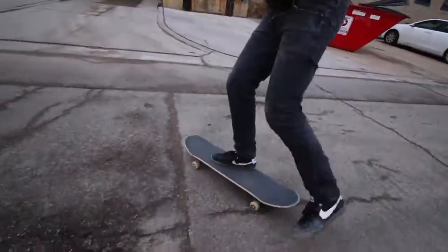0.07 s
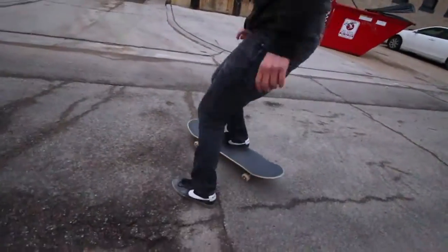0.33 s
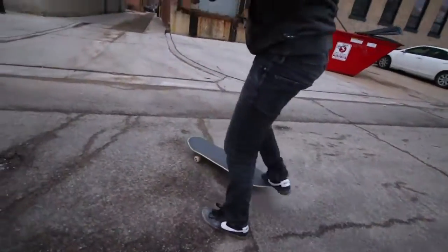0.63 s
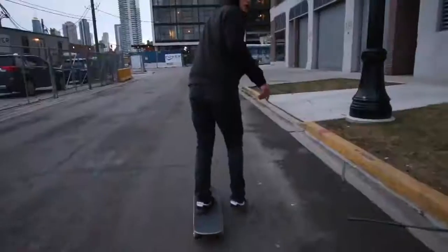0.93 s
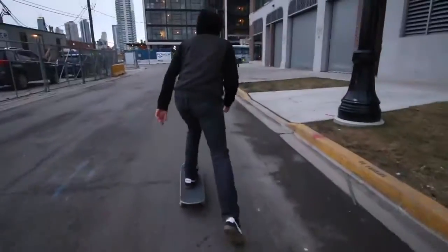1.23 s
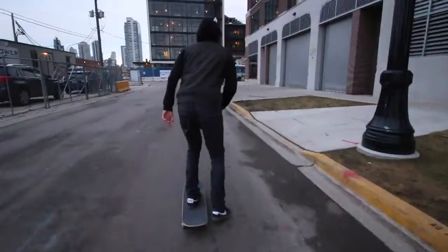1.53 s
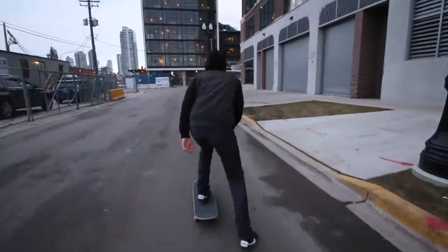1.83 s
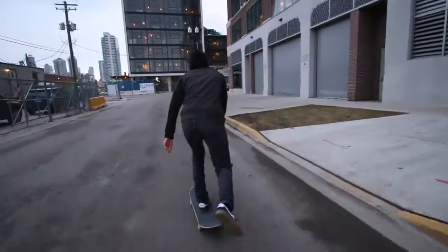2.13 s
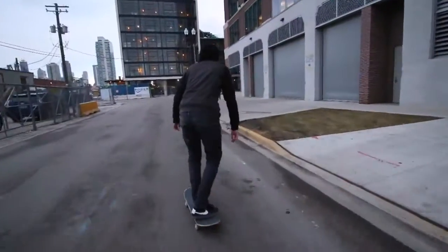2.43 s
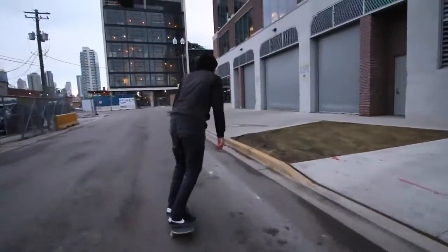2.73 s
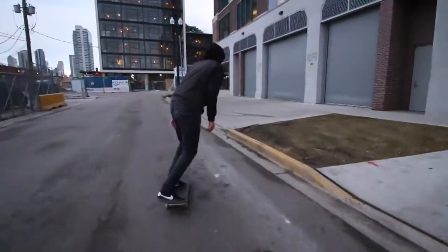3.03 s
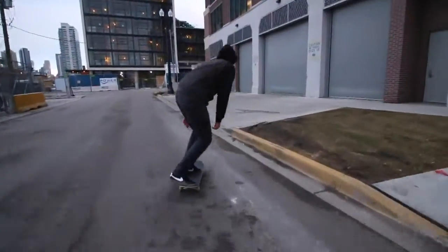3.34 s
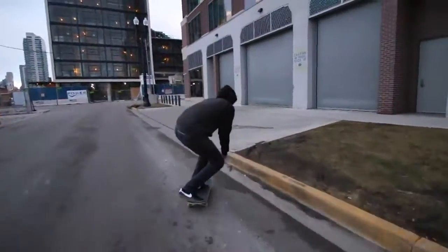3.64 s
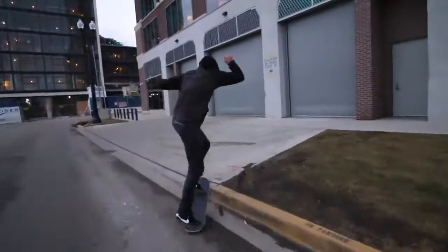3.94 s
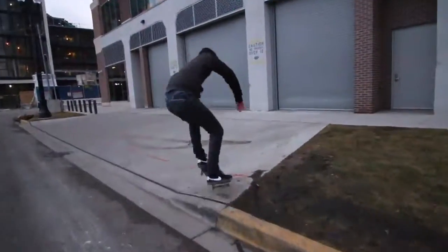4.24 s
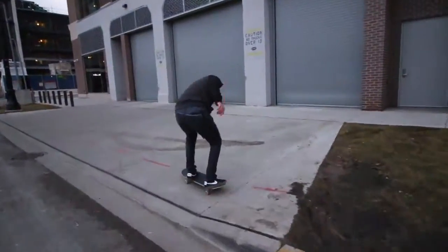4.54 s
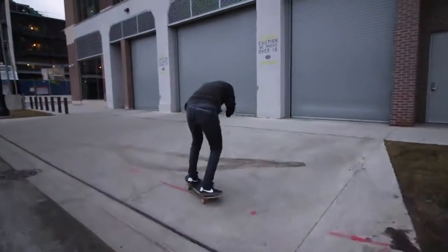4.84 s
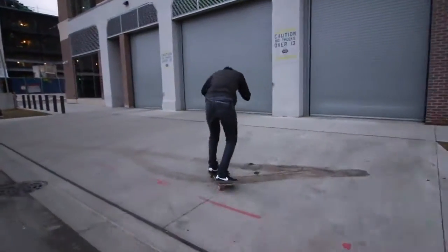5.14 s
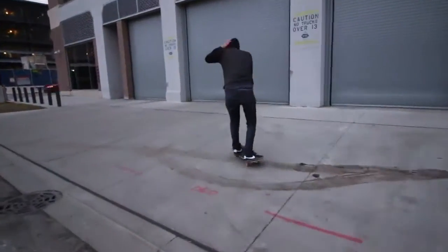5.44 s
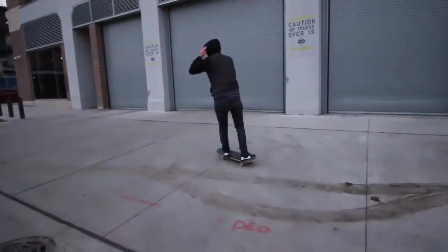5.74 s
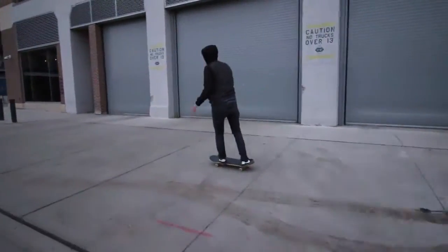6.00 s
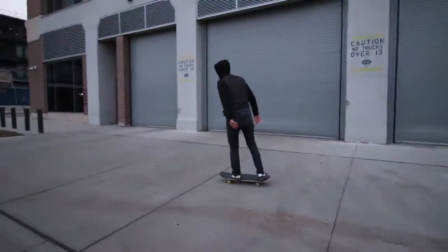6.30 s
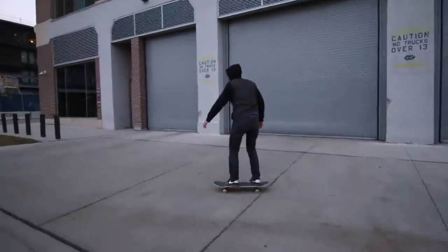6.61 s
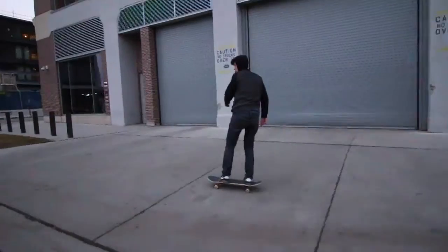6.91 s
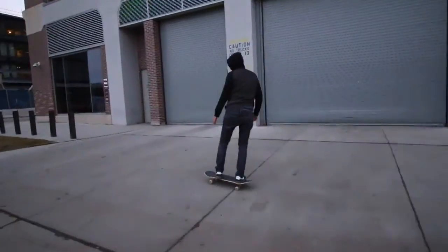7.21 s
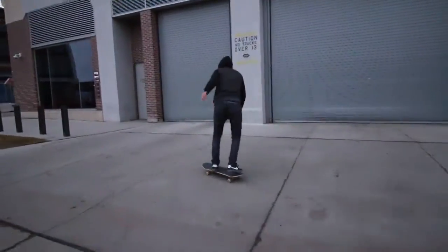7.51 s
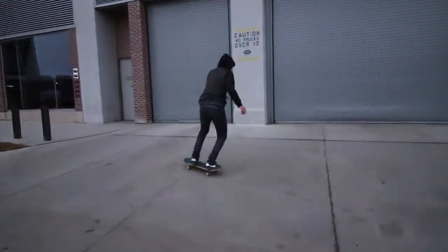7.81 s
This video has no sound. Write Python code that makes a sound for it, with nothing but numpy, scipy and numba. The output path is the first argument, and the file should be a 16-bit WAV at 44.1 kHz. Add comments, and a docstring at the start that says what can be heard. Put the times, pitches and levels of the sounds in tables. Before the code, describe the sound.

On a city street, a skateboard rattles, scrapes and slaps down before rolling off with a close, steady rumble and crackling sand. Soles scuff the road as another skater ahead carves, jumps a kerb and lands with a sharp clack. Both boards roll on with small metal clinks and thuds over slab joints. Wind buffets the low, moving microphone in gusts.

```python
"""A skateboard rolling down a city street, microphone low over its wheels, a second skater just ahead.
The follower scrapes his board along the ground, drops it and rides: asphalt grains drum on the deck and
ring the wheels, sand crackles, slab joints thump. Soles scuff; the skater ahead carves, pops up a kerb
and lands with a clack. House fronts return a short echo, and wind buffets the microphone ports."""
import sys
import numpy as np
from scipy import signal
from scipy.fft import rfft, irfft
from scipy.io import wavfile
from scipy.ndimage import uniform_filter1d
from numba import njit

SR = 44100
rng = np.random.default_rng(int(sys.argv[2]) if len(sys.argv) > 2 else 0)


def wav_out(sig):
    """Save sig, one row per channel (or a flat mono array), as 16-bit PCM at SR to the path in sys.argv[1]."""
    wavfile.write(sys.argv[1], SR, np.round(np.clip(np.atleast_2d(sig).T, -1, 1) * 32767).astype(np.int16))


N = 351036
TIME = np.arange(N) / SR
RIDE_START_S = 0.921

# The near deck's rumble, louder on coarse road. Each row: time in seconds, level in dB.
ROLL_LEVELS = [(0.93, -17.5), (1.15, -19.5), (1.55, -18.5), (2.1, -19), (2.55, -15.5), (2.7, -25.5),
               (3.0, -21.5), (3.3, -17.5), (3.55, -22.5), (3.8, -16.5), (4.1, -20), (5.0, -18), (5.55, -17),
               (6.0, -17.5), (6.4, -19.5), (7.1, -18), (7.96, -19)]
# Its boom, shifting as the rider's weight moves.
# Each row: time in seconds, pitch in Hz, level against the rumble in dB.
DECK_BOOM = [(0.95, 575, -17), (1.35, 480, -6), (1.6, 485, -5), (1.95, 425, -8), (2.25, 470, -12),
             (2.52, 610, -13), (2.75, 475, -10), (3.08, 450, -14), (3.25, 590, -19), (3.6, 472, -16),
             (4.5, 495, -9.5), (5.5, 446, -22), (5.85, 458, -4), (6.05, 525, -4.5), (6.4, 508, -25.5),
             (7.96, 544, -9.5)]
# Stones and slab joints under the microphone. Each row: start in seconds, attack level in dB.
JOLTS = [(1.354, -18), (1.685, -20), (3.166, -15), (3.257, -16), (6.018, -17), (6.043, -12), (6.136, -22),
         (6.195, -15.5), (6.289, -12), (7.612, -14)]
# The loose board striking the ground before the ride. Each row: start in seconds, attack level in dB,
# brightness in dB per octave, ring against blow in dB, pitch ratio of the ring.
LOOSE_CLACKS = [(0.11, -23, -8, -2, 1.1), (0.139, -28, -3.5, -6, 1), (0.159, -21, -9.5, 7, 0.9),
                (0.297, -23, -3, -24, 1.2), (0.346, -19, -4, 17, 0.87), (0.374, -23.5, -4, -4, 1.1),
                (0.548, -25, -1, -10, 1.9), (0.8334, -7, 2.5, -5, 1.01), (0.872, -18, 0.5, -1, 1.1),
                (0.887, -22.5, 1.5, -6, 1.8)]
# The deck ahead knocking underfoot: bumps, pop, double slap of the landing, rebounds. Rows as above.
RIDDEN_CLACKS = [(2.766, -18, -14.5, -8, 1.13), (3.361, -20, -10, -8, 1.1), (3.915, -19, -11, 9, 0.84),
                 (4.0499, -17.5, -1, 1, 1.13), (4.059, -21.5, -3.5, -1, 1.18), (4.3755, -16.5, -0.5, 3, 1),
                 (4.378, -15.5, -1, 3, 1.01), (4.391, -25, 1.5, -2, 1.08), (4.419, -28, -7, 3, 1.4),
                 (7.762, -20.5, -13.5, -1, 1.1)]
# The loose maple deck's ring. Each row: frequency in Hz, level in dB, 60 dB decay time in seconds,
# all before a clack's own pitch ratio and brightness.
LOOSE_MODES = [(664, 0, 0.04), (1350, -5, 0.04), (1630, -11, 0.03), (2230, -10, 0.022), (2900, -22, 0.03)]
# The deck ahead, clamped underfoot, rings higher. Rows as above.
RIDDEN_MODES = [(980, 0, 0.034), (1240, -1, 0.036), (1450, 1, 0.022), (1770, -12, 0.045), (2180, -7, 0.03),
                (2550, -5, 0.03), (3600, -12, 0.018)]
# The metal trucks' ring. Each row: frequency in Hz, relative level in dB.
TRUCK_MODES = [(1750, 2), (2270, 10.5), (3250, -3.5), (4800, -5)]
# Swells of wheel chatter and sand from either board: scraping, rolling off, swerving, landing.
# Each row: middle in seconds, length in seconds, chatter level in dB, sand level in dB.
WHEEL_SWELLS = [(0.106, 0.094, -39, -49), (0.507, 0.21, -28.5, -37), (0.8, 0.15, -34.5, -44),
                (0.992, 0.19, -29.5, -64), (2.348, 0.83, -44, -48), (2.593, 0.72, -28, -62),
                (3.287, 0.18, -27, -48), (3.865, 0.34, -28.5, -42.5), (4.483, 0.12, -33, -45),
                (5.494, 1, -37, -50), (7.16, 0.82, -35.5, -42.5), (7.887, 0.06, -36, -41)]
# Soles, board edge and sideways-sliding wheels scraping on the road. Each row: start and end in seconds,
# level in dB, brightness in dB per octave, sand level in dB.
SCUFFS = [(0.32, 0.417, -38, 5, -55), (0.412, 0.567, -29.5, 1.5, -47), (0.565, 0.652, -41, 5, -59),
          (0.647, 0.726, -34, 8.5, -47), (1.048, 1.253, -26, -4.5, -52), (1.68, 1.933, -26, -6, -52.5),
          (2.639, 2.7, -25.5, -8.5, -63), (3.155, 3.62, -27, -14.5, -59), (3.7, 3.993, -27, -13.5, -59)]
# The trucks ahead twisting or crossing a joint.
# Each row: start in seconds, attack level in dB, pitch ratio of the ring.
CLINKS = [(2.731, -35, 1.46), (3.3065, -36, 1.5), (3.5405, -39, 1.25), (4.807, -32, 1.17),
          (4.938, -35, 1.28), (5.284, -38, 1.55), (7.446, -28.5, 1.43), (7.522, -31, 1.3),
          (7.873, -29.5, 1.27)]
# Pebbles cracking and hardware clicking. Each row: start in seconds, peak level in dB.
TICKS = [(0.331, -29.5), (2.731, -37), (3.806, -21), (3.88, -21), (4.376, -20), (4.433, -26), (4.526, -23),
         (4.573, -29), (7.439, -25), (7.7535, -31.5)]
# Coarse grit bursting under the wheels. Each row: middle in seconds, length in seconds, level in dB.
CRUNCHES = [(3.85, 0.16, -48), (4.416, 0.054, -44), (4.52, 0.13, -53)]
# A free wheel singing in its bearing. Each row: frequency in Hz, level in dB.
BEARING_TONES = [(2650, -44.5), (2750, -49)]
# Wind at the microphone. Each row: middle in seconds, length in seconds, rise in dB (negative: a lull).
GUSTS = [(1.2, 0.35, 1), (1.85, 0.39, -5), (2.397, 0.2, 4.5), (2.965, 0.51, 13), (3.636, 0.23, 5.5),
         (4.24, 0.43, 8.5), (6.38, 0.56, -10.5), (7.718, 0.61, 7)]

# Each source's spectrum at the microphone. Each row: frequency in Hz, relative level in dB.
DECK_COLOUR = [(40, -30), (80, -20.5), (160, -4.5), (260, 0), (400, 0.5), (490, 0), (640, 0.5), (740, -8),
               (860, -21), (1300, -34)]
WHEEL_COLOUR = [(500, -11.5), (860, -4), (950, 2.5), (1005, 9.5), (1080, 4), (1250, -4), (1500, -12.5),
                (2000, -33.5), (3000, -25), (4800, -49.5), (7000, -45.5), (12000, -59)]
CLACK_COLOUR = [(120, -35), (300, 11.5), (500, 5), (700, 8.5), (880, 3), (1150, 7.5), (1600, 4), (2800, -4),
                (4200, -10), (6000, -18), (9500, -28), (15000, -47)]
CHATTER_COLOUR = [(200, -10.5), (430, -4.5), (620, 12), (850, 4.5), (1050, 8.5), (1500, 0), (1900, -3.5),
                  (2300, -12), (3200, -32), (5000, -33.5), (9000, -47)]
WHEEL_SAND_COLOUR = [(1000, 8.5), (2500, 14.5), (4800, 5.5), (6500, -1), (7600, -3.5), (9800, -2),
                     (12500, -12.5), (15500, -58)]
SCUFF_COLOUR = [(400, -8.5), (900, -11.5), (1200, -3), (1480, 4), (1850, -4), (2450, -5), (2800, -14),
                (4000, -21), (7000, -35), (14000, -51)]
SCUFF_SAND_COLOUR = [(2500, -8), (4500, -5.5), (6400, 1), (8000, -4), (9500, -3.5), (12500, -13),
                     (15500, -31)]
TICK_COLOUR = [(1000, -28), (3000, 5), (5000, 8), (9000, 8.5), (12500, 3), (15500, -4)]
WIND_COLOUR = [(25, -22), (45, -7.5), (90, -0.5), (160, 3.5), (250, -1.5), (400, -8), (650, -14.5),
               (1000, -26)]
RUMBLE_COLOUR = [(45, -10.5), (85, 0.5), (130, -3), (230, 0.5), (320, -4.5), (430, -15.5)]
# Stereo width of sounds off the road. Each row: frequency in Hz, side against mid in dB.
SIDE_COLOUR = [(100, -22), (500, -37.5), (1000, -22.5), (2000, -6.5), (4000, -2), (12000, -1.5)]


def near_board(turns, wheels_db=-11, trucks_db=-18.5):
    """Just under the microphone, road stones drum the deck and ring the wheels; chips shake the trucks."""
    road = grains(per_s=4800, scatter_db=1)
    chips = grains(per_s=540, scatter_db=3)
    deck = unit(colour(road, DECK_COLOUR))
    wheels = unit(colour(road * turns, WHEEL_COLOUR))
    wheels += unit(truck_ring(chips * turns)) * undb(trucks_db)
    board = deck + deck_boom(deck) + wheels * undb(wheels_db)
    standing_on = np.clip((TIME - RIDE_START_S) / 0.011, 0, 1)
    return board * undb(curve(ROLL_LEVELS)) * standing_on


def deck_boom(deck):
    """The deck's main bending resonance glides under the rider's weight."""
    boom = resonate(deck, curve(DECK_BOOM), q=7.5)
    return unit(boom) * undb(curve(DECK_BOOM, column=2))


def truck_ring(chips, t60=0.009):
    """Metal hangers and axles, damped by their bushings, ring for a few milliseconds."""
    t = np.arange(SR // 20) / SR
    ring = sum(decaying_tone(t, hz, db, t60) for hz, db in TRUCK_MODES)
    return signal.oaconvolve(chips, ring[None], axes=-1)[:, :N]


def wheel_turns(turn_hz, depth_db):
    """A worn wheel presses harder once in each turn."""
    revolutions = np.cumsum(turn_hz * (1 + 0.0694 * walk(2))) / SR
    return undb(depth_db * np.sin(2 * np.pi * revolutions))


def jolts(wheel_db=-8):
    """A near wheel meets a joint or a stone: one close thump rings the deck's boom and the wheel."""
    out, boom_hz = np.zeros((2, N)), curve(DECK_BOOM)
    for start, db in JOLTS:
        push = blow(t60=0.012, rattle=0.11, width_db=2)
        hz = np.full(push.shape[1], boom_hz[int(start * SR)])
        deck = unit_attack(resonate(colour(push, DECK_COLOUR), hz, q=2.2))
        wheel = unit_attack(colour(push, WHEEL_COLOUR))
        add(out, start, unit_attack(deck + wheel * undb(wheel_db)) * undb(db))
    return out


def clacks(blows, modes):
    """Tail and wheels slap the ground, firm blows cleanly, light ones rattling; the deck rings briefly."""
    out, t = np.zeros((2, N)), np.arange(SR // 4) / SR
    for start, db, tilt_db, ring_db, pitch in blows:
        rattle_t60 = 0.012 * 2 ** (-db / 8.5)  # twice as long for a blow 8.5 dB lighter
        hit = colour(blow(rattle_t60, rattle=0.15, width_db=-3), CLACK_COLOUR, tilt_db)
        ring = sum(decaying_tone(t, pitch * hz, mode_db + tilt_db * np.log2(hz), t60 / pitch)
                   for hz, mode_db, t60 in modes)
        clack = unit_attack(hit) + undb(ring_db) * unit_attack(ring)
        add(out, start, unit_attack(clack) * undb(db))
    return out


def wheel_chatter(coasting_db=-34.5):
    """Wheels chatter over the road's grain, swelling as a board scrapes, rolls off, swerves or lands."""
    road = grains(per_s=2400, scatter_db=2, width_db=1) * undb(2 * walk(30))
    swells = [(middle, length, db) for middle, length, db, _ in WHEEL_SWELLS]
    return unit(colour(road, CHATTER_COLOUR)) * undb(contact_db(coasting_db, swells))


def judder(turns, drum_hz=760, ring_db=-9, db=-27.5):
    """Carving to the kerb, wheels grip and skip, drumming the tilted deck and ringing the truck."""
    skips = grains(per_s=500, scatter_db=2.5) * turns ** 2 * undb(3 * walk(12))
    ring_hz = TRUCK_MODES[0][0] * (1 + 0.03 * walk(12))  # the lowest mode wavers with the load
    ring = unit(resonate(skips, ring_hz, q=17.0))
    drum = unit(resonate(colour(skips, CHATTER_COLOUR), np.full(N, float(drum_hz)), q=2.0))
    return (drum + undb(ring_db) * ring) * undb(db) * swell(middle_s=3.33, length_s=0.3)


def grit(turns, coasting_db=-50, right_db=0.7):
    """Sand crackles under the wheels, a little to the right; under load it splinters and brightens."""
    swells = [(middle, length, db) for middle, length, _, db in WHEEL_SWELLS]
    sand_db = contact_db(coasting_db, swells)
    splinter_db = -80 + 2.3 * (sand_db - coasting_db)
    sand = colour(grains(per_s=7700, scatter_db=-2.2) * turns, WHEEL_SAND_COLOUR)
    splinters = colour(grains(per_s=2800, scatter_db=3.5) * turns, [(13000, 0)])
    crackle = unit(sand) * undb(sand_db) + unit(splinters) * undb(splinter_db)
    return crackle * undb([[-right_db], [right_db]])


def scuffs():
    """Soles, board edge and sideways-sliding wheels catch and slip on the road, crushing sand."""
    out = np.zeros((2, N))
    catching = undb(2.2 * walk(110))
    slips = grains(per_s=1800, scatter_db=1.8, width_db=-14) * catching
    sand = grains(per_s=3900, scatter_db=-4, width_db=-1) * catching
    for start, end, db, tilt_db, sand_db in SCUFFS:
        span = np.arange(int(start * SR), int(end * SR))
        contact = signal.windows.tukey(len(span), 0.14)
        scrape = unit(colour(slips[:, span] * contact, SCUFF_COLOUR, tilt_db))
        crush = unit(colour(sand[:, span] * contact, SCUFF_SAND_COLOUR))
        add(out, start, scrape * undb(db) + crush * undb(sand_db))
    return out


def clinks(t60=0.025):
    """On the board ahead, a truck's washers snap against the hanger, which rings briefly."""
    out, t = np.zeros((2, N)), np.arange(SR // 4) / SR
    for start, db, pitch in CLINKS:
        ring = sum(decaying_tone(t, pitch * hz, mode_db, t60) for hz, mode_db in TRUCK_MODES)
        snap = colour(blow(2 * t60, rattle=0.3, width_db=-4), CLACK_COLOUR, tilt_db=2.5)
        clink = 0.5 * unit_attack(ring) + unit_attack(snap)
        add(out, start, unit_attack(clink) * undb(db))
    return out


def ticks():
    """Pebbles and loose washers crack brightly; hard-pressed wheels burst grit into a finer spray."""
    spray = unit(colour(grains(per_s=900, scatter_db=2, width_db=3), TICK_COLOUR))
    out = spray * sum(undb(db) * swell(middle, length) for middle, length, db in CRUNCHES)
    for start, db in TICKS:
        hit = colour(blow(t60=0.029, rattle=0.66, width_db=-3.5), TICK_COLOUR)
        add(out, start, hit * undb(db) / np.abs(hit).max())
    return out


def squeak(start_s, end_s, start_hz, end_hz, db):
    """A rubber sole twists on the grip tape: a short, raspy chirp."""
    hz = np.interp(TIME, [start_s, end_s], [start_hz, end_hz]) * (1 + 0.11 * walk(900))
    phase = 2 * np.pi * np.cumsum(hz) / SR
    tone = np.sin(phase) + np.sin(2 * phase) / 3.5 + np.sin(3 * phase) / 10
    press = np.sin(np.pi * np.clip((TIME - start_s) / (end_s - start_s), 0, 1))
    return undb(db + 3 * walk(300)) * press * tone


def bearing():
    """A wheel of the lifted board spins freely and sings, wavering, until it meets the road."""
    song = np.zeros(N)
    for hz, db in BEARING_TONES:
        level = undb(db + 3 * walk(40))
        wavering_hz = hz * (1 + 0.01 * walk(150))
        song += level * np.sin(2 * np.pi * np.cumsum(wavering_hz) / SR)
    spin = np.interp(TIME, [0.45, 0.7, 0.8, 0.9], [0, 1, 1, 0])
    return song * spin


def wind(right_bias=0.14):
    """Eddies buffet each microphone port over a shared rumble: handling at first, then headwind."""
    gust_db = sum(db * swell(middle, length) for middle, length, db in GUSTS)
    riding = np.clip((TIME - RIDE_START_S) / 0.21 + 0.5, 0, 1)
    wind_db = np.interp(riding, [0, 1], [-34.5, -31]) + gust_db
    rumble_db = np.interp(riding, [0, 1], [-22, -35])
    rumble_db += gust_db * np.where(gust_db > 0, 0.15, 1.4)  # gusts add little, lulls take it away
    port_db = right_bias * np.array([-gust_db, gust_db])  # gusts strike the right port harder
    eddies = unit(colour(rng.standard_normal((2, N)), WIND_COLOUR)) * undb(wind_db + walk(14) + port_db)
    rumble = unit(colour(rng.standard_normal(N), RUMBLE_COLOUR)) * undb(rumble_db + 0.37 * walk(9.7))
    microphone_moving = np.interp(TIME, [0, 0.44], [0.2, 1])
    return (eddies + rumble) * microphone_moving


def street_echo(sound, t60=0.23, delay_s=0.012):
    """House fronts return a short, thin tail that grows as the skaters near the wall."""
    t = np.arange(int(0.8 * SR)) / SR
    tail = rng.standard_normal((2, len(t))) * undb(-60 * t / t60) * (t > delay_s)
    tail = colour(tail, [(200, -13.5), (2500, 7), (10000, 2.5)]) / np.sqrt(np.sum(tail[0] ** 2))
    echo = signal.fftconvolve(sound.mean(axis=0)[None], tail)[:, :N]
    return echo * undb(np.interp(TIME, [4.6, 6.5], [-20.5, -7.5]))


def grains(per_s, scatter_db, width_db=0):
    """Tiny impacts of uneven size at random moments, each from its own direction."""
    size = undb(scatter_db * np.minimum(rng.exponential(size=N), 5.5))
    direction = np.clip(rng.standard_normal((2, N)), -2, 2)
    struck = rng.random(N) < per_s / SR
    return stereo(struck * size * direction, width_db)


def blow(t60, rattle, width_db):
    """A sharp contact straight ahead of the microphone, then a quickly dying rattle."""
    t = np.arange(SR // 4) / SR
    push = rattle * rng.standard_normal((2, len(t))) * undb(-60 * t / t60)
    push[0, 0] += 1
    return stereo(push, width_db)


def contact_db(coasting_db, swells):
    """Level of a wheel on the ground: steady coasting and passing swells add in power."""
    swell_power = sum(undb(db) ** 2 * swell(middle, length) for middle, length, db in swells)
    return 10 * np.log10(undb(coasting_db) ** 2 + swell_power)


def decaying_tone(t, hz, db, t60):
    """One struck mode, falling 60 dB in t60 seconds."""
    return undb(db - 60 * t / t60) * np.sin(2 * np.pi * hz * t)


@njit
def resonate(x, hz, q):
    """Band-pass each channel around a moving centre."""
    y = np.empty(x.shape)
    for channel in range(len(x)):
        band, low = 0.0, 0.0
        for i in range(x.shape[1]):
            g = np.tan(np.pi * hz[i] / SR)
            v = (band + g * (x[channel, i] - low)) / (1 + g * (g + 1 / q))
            band, low = 2 * v - band, low + 2 * g * v
            y[channel, i] = v
    return y


def colour(x, points, tilt_db=0, size=4096):
    """Filter through (Hz, dB) points, 12 dB per octave down beyond them, tilted about 1.5 kHz."""
    octave = np.log2(np.maximum(np.arange(size // 2 + 1) * SR / size, 5))
    hz, db = np.transpose(points)
    knots = np.log2(hz)
    beyond = np.maximum(knots[0] - octave, 0) + np.maximum(octave - knots[-1], 0)
    tilt = tilt_db * np.clip(octave - np.log2(1500), -1.6, 1.7)
    gain_db = np.interp(octave, knots, db) - 12 * beyond + tilt
    cepstrum = irfft(np.log(undb(gain_db)))
    cepstrum[1:size // 2] *= 2  # minimum phase: nothing rings ahead of a blow
    cepstrum[size // 2 + 1:] = 0
    response = irfft(np.exp(rfft(cepstrum)))
    return signal.oaconvolve(x, response if x.ndim == 1 else response[None], axes=-1)[..., :x.shape[-1]]


def stereo(pair, width_db):
    """Mid and side to left and right: bass reaches both ports alike, treble does not."""
    side = colour(pair[1], SIDE_COLOUR) * undb(width_db)
    return np.array([pair[0] + side, pair[0] - side])


def walk(per_s):
    """A smooth random wander with a spread near 1."""
    hold = int(SR / per_s)
    steps = np.repeat(rng.standard_normal(N // hold + 1), hold)
    return 1.3 * uniform_filter1d(uniform_filter1d(steps, hold), hold)[:N]


def swell(middle_s, length_s):
    """A smooth rise and fall, above half height for length_s."""
    return 0.5 ** ((2 * (TIME - middle_s) / length_s) ** 2)


def curve(rows, column=1):
    """One column of a table of times, joined by straight lines."""
    rows = np.array(rows)
    return np.interp(TIME, rows[:, 0], rows[:, column])


def add(out, start_s, sound):
    """Mix a short sound in at start_s."""
    i = int(start_s * SR)
    out[:, i:i + sound.shape[1]] += sound[:, :N - i]


def undb(db):
    """Decibels to gain."""
    return 10 ** (np.asarray(db) / 20)


def unit(x):
    """Scale to rms 1."""
    return x / np.sqrt(np.mean(x ** 2))


def unit_attack(x):
    """Scale so that the attack, the first 10 ms, has rms 1."""
    return x / x[..., :SR // 100].std()


def scene(left_db=0.5):
    """Both boards sit a little to the left; sounds ahead echo off the houses; wind lies over all."""
    turns = wheel_turns(turn_hz=22.78, depth_db=1.56)
    ahead = clacks(LOOSE_CLACKS, LOOSE_MODES) + clacks(RIDDEN_CLACKS, RIDDEN_MODES)
    ahead += clinks() + ticks() + scuffs() + wheel_chatter() + judder(turns)
    ahead += squeak(start_s=1.603, end_s=1.648, start_hz=2330, end_hz=1850, db=-32)
    echo = street_echo(ahead)
    boards = near_board(turns) + jolts() + bearing() + ahead + echo
    return boards * undb([[left_db], [-left_db]]) + grit(turns) + wind()


def record(dry, top_hz=15800):
    """Peaks flatten at full scale, and the top treble is cut steeply."""
    low_pass = signal.ellip(10, 0.2, 80, top_hz, fs=SR, output="sos")
    return signal.sosfilt(low_pass, np.clip(dry, -1, 1))


dry = scene()
out = record(dry)
wav_out(out)
```